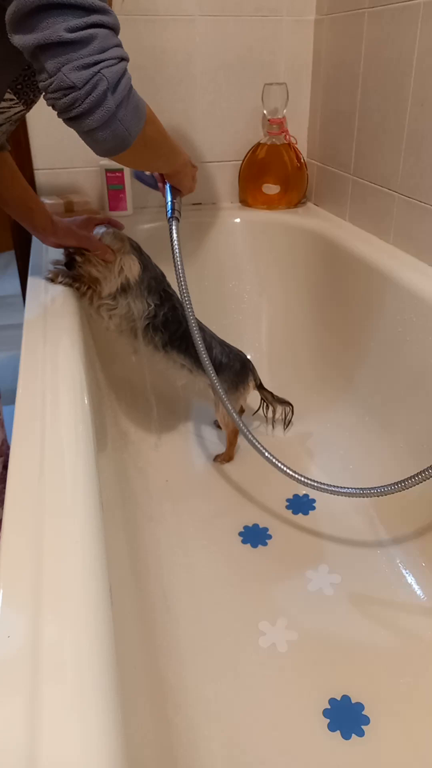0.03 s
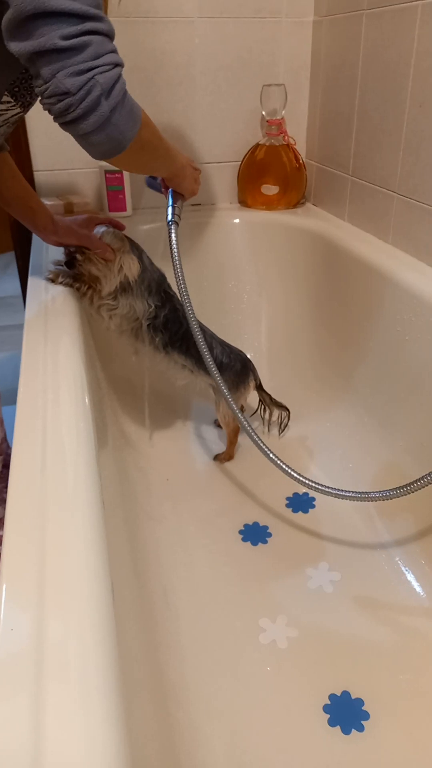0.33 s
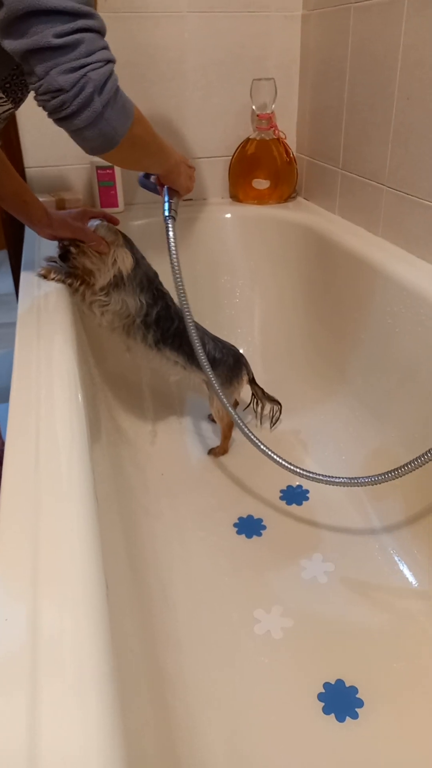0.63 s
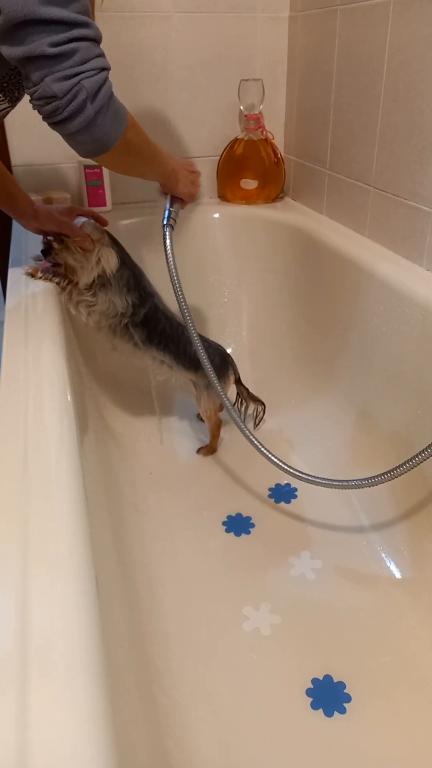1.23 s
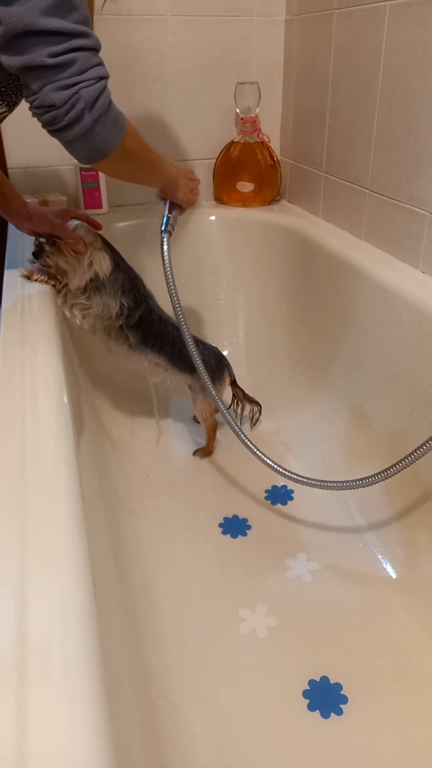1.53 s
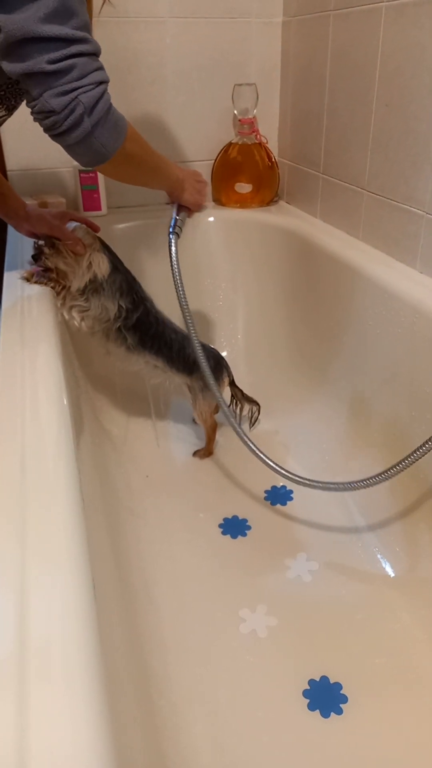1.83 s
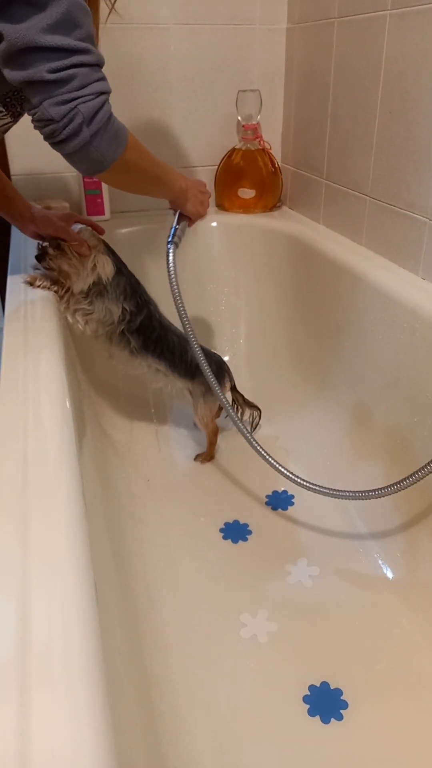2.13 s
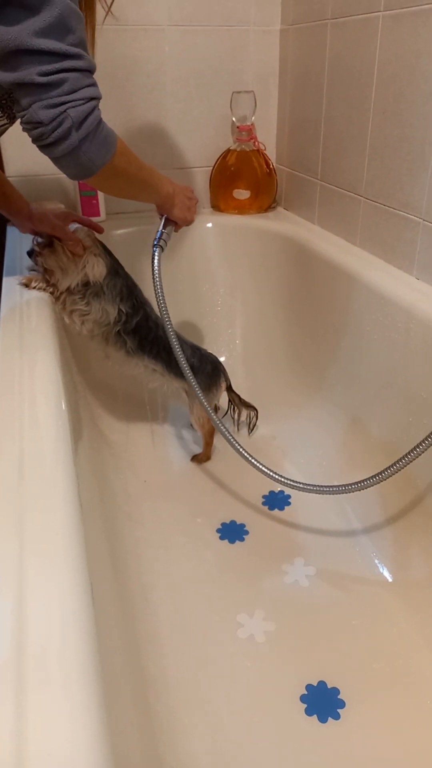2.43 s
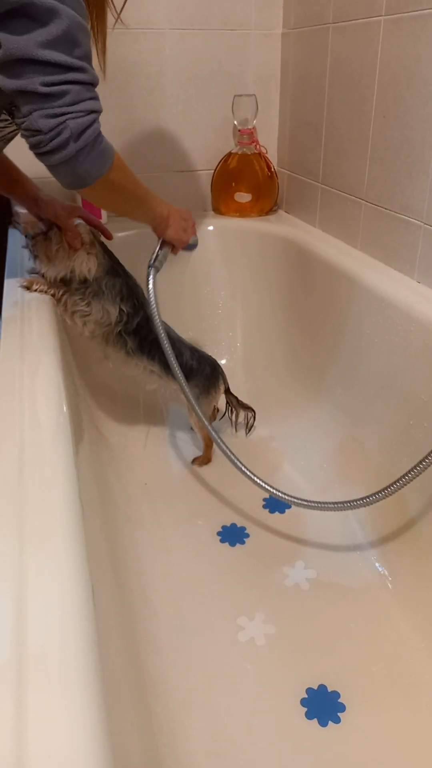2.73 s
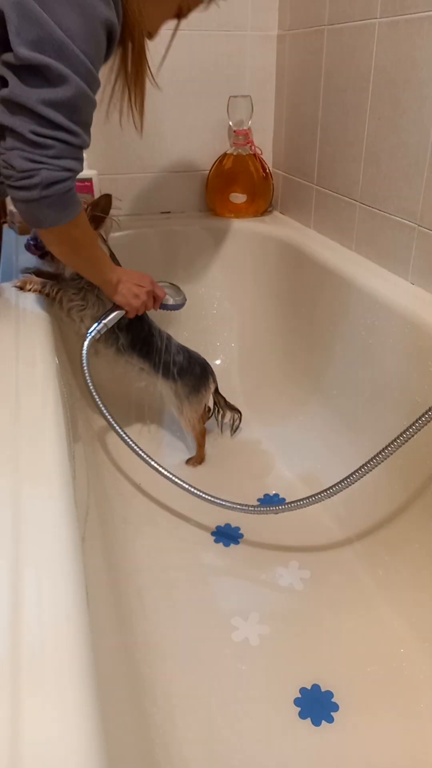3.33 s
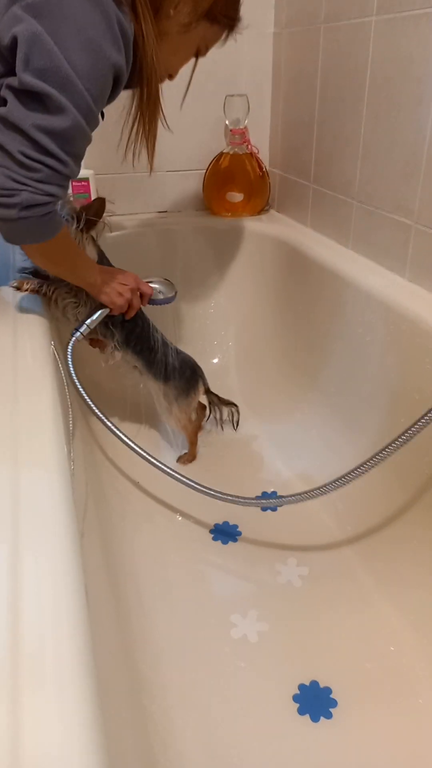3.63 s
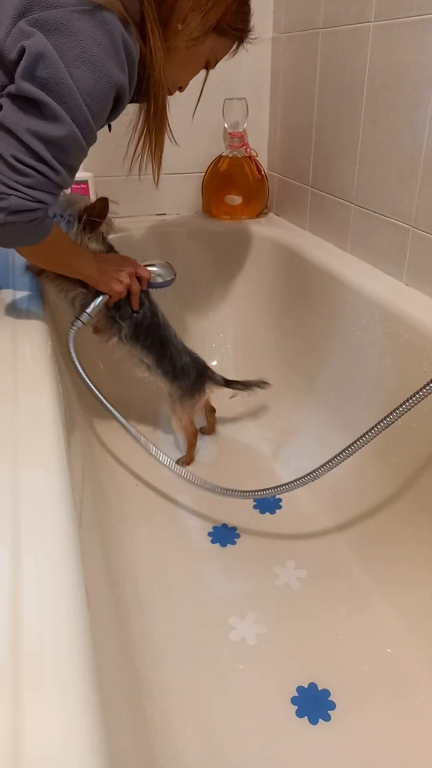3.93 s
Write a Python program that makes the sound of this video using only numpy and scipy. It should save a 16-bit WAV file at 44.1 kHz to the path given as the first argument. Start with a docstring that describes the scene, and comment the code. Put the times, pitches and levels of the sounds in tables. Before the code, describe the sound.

A hand shower sprays over a small dog and a bathtub from the start, a bright, slightly wavering hiss with patter and small bubbly splashes. Occasional fat drops tick, and the jet drums softly and hollowly around 1.5 and 3 seconds. The spray eases a little near 3.7 seconds, and something hard clacks sharply against the tub at about 3.9. A faint hum underlies the tiled bathroom.

```python
"""A hand shower sprays over a small dog in a bathtub in a tiled bathroom.
Fine droplets hiss on tub and coat; heavier drops trap ringing bubbles in the film of water.
At times the jet drums in a hollow, fat drops tick and the tub booms softly.
A faint hum and rumble stand behind. At the end something hard clacks against the tub."""
import sys
import numpy as np
from scipy import signal
from scipy.fft import rfft, irfft, next_fast_len
from scipy.io import wavfile

SR = 44100
rng = np.random.default_rng(int(sys.argv[2]) if len(sys.argv) > 2 else 0)


def log_audio(samples):
    """Write samples as a 16-bit WAV file to the path given in sys.argv[1]."""
    # one column per channel
    frames = np.atleast_2d(samples).T
    # limit to full scale, then quantise
    limited = np.clip(frames, -1, 1)
    pcm = np.round(limited * 32767).astype(np.int16)
    wavfile.write(sys.argv[1], SR, pcm)


N = 176400
TIME = np.arange(N) / SR

# Room rumble spectrum: f/Hz, relative density/dB
RUMBLE_SPECTRUM = [(15, -45), (28, -24), (46, 4), (62, 8.5), (80, -0.5), (125, 1), (170, -7.5), (240, -0.5),
                   (340, -7.5), (500, -6), (900, -28), (3000, -18)]
# Hum partials: f/Hz, level/dB
HUM_PARTIALS = [(100, -83.5), (200, -79.5), (300, -74)]
# Dull bumps in the tub: t/s, length/s, f/Hz, level/dB
TUB_BUMPS = [(.15, 0.5, 63.4, -64.5), (1.11, .08, 250, -66), (2.043, .09, 210, -61.5)]
# Blows of the clack and its rebound: t/s, level/dB
CLACK_BLOWS = [(3.91, -29), (3.9117, -18.5), (3.914, -27), (3.927, -22)]
# Colour of the crack: f/Hz, gain/dB
CRACK_SPECTRUM = [(60, -21), (170, -22), (420, -42), (620, -4), (850, -4), (1100, -8), (1500, 5),
                  (1900, -3), (2600, 3.5), (3300, -1), (4200, 2.5), (5300, -7), (6500, -3), (8600, -1),
                  (10200, -2.5), (11200, 0.5), (13000, -2.5), (15500, 2)]
# Modes rung by the clack: f/Hz, relative level/dB, t60/s
CLACK_MODES = [(94.6, -27.5, .6), (670, -18, .15), (856, -28, 0.18), (1430, -25, 0.09), (1490, -11, .12),
               (2040, -25, .08), (2430, -12, .1), (3160, -14, 0.081), (3720, -17, .06), (4540, -18, .07)]
# Fat drops: t/s, level/dB, centre f/Hz, t60/s
FAT_DROPS = [(0.235, -39, 8000, .015), (0.261, -47, 6450, .15), (0.336, -38, 6500, 0.11),
             (0.669, -36.5, 4670, 0.059), (0.769, -38, 9000, 0.15), (0.814, -42.5, 1190, 0.014),
             (1.124, -29.5, 7500, 0.024), (1.593, -32.5, 6640, 0.027), (3.126, -36, 8200, 0.057),
             (3.305, -44, 13000, .015), (3.595, -34, 13500, .02), (3.622, -28, 13500, 0.013)]
# Jet in a hollow: t/s, length/s, rise/share of length, first f/Hz, last f/Hz, width/Hz, level/dB
HOLLOW_SWELLS = [(.1, 1, 0.49, 707, 708, 7.6, -71), (0.503, 0.66, 0.36, 1996, 2003, 220, -58),
                 (1.454, 0.12, 0.33, 2110, 1644, 320, -52), (1.493, 0.33, 0.22, 1270, 1135, 123, -49.5),
                 (1.777, .08, 0.46, 1900, 2095, 340, -51), (2.621, .56, 0.69, 2307, 2490, 650, -49.5)]
# Splash envelope: t/s, small-bubble level/dB, large-bubble level/dB
SPLASH_LEVELS = [(0.08, -51.5, -65.0), (0.16, -45, -60.5), (0.32, -50, -63.5), (0.38, -43, -58.5),
                 (0.48, -49, -65.5), (0.66, -45, -56.5), (0.88, -52, -62.5), (0.92, -46.5, -61),
                 (1.14, -51.5, -70), (1.18, -43.5, -62), (1.3, -52.5, -69.5), (1.44, -56, -81),
                 (1.48, -44, -67.5), (1.56, -42.5, -63), (1.6, -49, -64), (1.72, -57, -72),
                 (1.82, -44, -57.5), (2.04, -54, -75), (2.12, -46.5, -64), (2.22, -53.5, -74),
                 (2.3, -60, -72), (2.38, -45.5, -62), (2.56, -52.5, -80), (2.6, -45, -67.0),
                 (2.74, -48, -96), (2.8, -53, -90), (3.04, -49.5, -84), (3.36, -49.5, -74),
                 (3.54, -46, -70), (3.88, -55, -76)]
# Bubble strength by pitch: f/Hz, relative level/dB
SMALL_BUBBLES = [(1200, -11.5), (1600, -4.5), (2000, -1), (2500, -8.5), (3200, -9)]
LARGE_BUBBLES = [(600, -4), (750, 2.5), (950, 9.5), (1300, 2), (1700, -8)]
# Spray envelope: t/s, mist level/dB, patter level/dB
SPRAY_LEVELS = [(0.08, -41, -43.5), (0.18, -38.5, -48.0), (0.28, -39, -42.5), (0.36, -35.5, -46.5),
                (0.42, -42, -46), (0.6, -36, -45), (0.64, -41, -48), (0.68, -37, -46.5), (0.72, -40, -44),
                (0.76, -34.5, -45), (0.86, -42, -47.0), (1.04, -35.5, -42.5), (1.1, -39, -45),
                (1.14, -37, -46), (1.18, -39.5, -45), (1.32, -36, -43.5), (1.4, -38.5, -47),
                (1.5, -40.5, -45.5), (1.6, -35, -42.5), (1.72, -40.0, -46), (1.84, -36, -45),
                (1.98, -38.5, -44.5), (2.04, -36.5, -46), (2.12, -41, -46), (2.22, -34, -42.5),
                (2.3, -39, -45.5), (2.36, -42, -43), (2.46, -36, -45.5), (2.6, -40.5, -45),
                (2.66, -34, -41.5), (2.88, -39.0, -43.5), (3.14, -39, -44.0), (3.24, -42.0, -47),
                (3.3, -39.5, -44.5), (3.36, -43.5, -47.5), (3.46, -39, -43.5), (3.64, -35.0, -45),
                (3.7, -45, -49), (3.76, -45.5, -50), (3.88, -44, -51.5)]
# Droplet spectra: f/Hz, relative density/dB
MIST_SPECTRUM = [(5000, -36), (8000, -21), (10500, -1), (12300, 4.5), (14000, 4.5), (15600, 5.5),
                 (17000, 0)]
PATTER_SPECTRUM = [(800, -23.5), (1300, -18), (2200, 1.5), (3000, 0), (4000, 1), (5300, -1), (7000, 0),
                   (9300, 0.5), (12000, -9.5), (16000, -14.5)]
# Stereo balance of the water: f/Hz, left minus right/dB
WATER_BALANCE = [(500, -1), (1200, -0.7), (2200, -0.5), (3300, 2.2), (5500, -3.5), (9000, 4.5),
                 (12500, -0.5), (15000, -5)]

ROOM_T60_S, ROOM_GAP_S, WATER_WET_DB = 0.32, 0.0023, 5.5
DROP_PAN_DB, DROP_LAG_S = 2, .0004


def from_db(db):
    """Decibels to gain."""
    return 10 ** (np.asarray(db) / 20)


def unit_rms(x):
    """Scale to unit power."""
    return x / np.sqrt(np.mean(x ** 2) + 1e-20)


def envelopes(rows):
    """Level columns interpolated to every sample."""
    times_s, *columns = np.transpose(rows)
    return [np.interp(TIME, times_s, column) for column in columns]


def db_at(spectrum, hz):
    """Spectrum level, interpolated over log frequency."""
    points_hz, points_db = np.transpose(spectrum)
    return np.interp(np.log(hz + 1e-9), np.log(points_hz), points_db)


def equalise(x, spectrum, share=1):
    """Filter by a spectrum, its dB scaled by share."""
    size = next_fast_len(N + SR // 10)
    gain = from_db(share * db_at(spectrum, np.fft.rfftfreq(size, 1 / SR)))
    return irfft(rfft(x, size) * gain, size)[..., :N]


def drift(rate_hz):
    """Low-passed noise, unit RMS."""
    hop, settle = 40, 2000
    pole = np.exp(-2 * np.pi * hop * rate_hz / SR)
    noise = rng.standard_normal(N // hop + settle + 2)
    slow = signal.lfilter([1], [1, -2 * pole, pole * pole], noise)[settle:]
    return np.interp(np.arange(N) / hop, np.arange(len(slow)), unit_rms(slow))


def narrow_noise(hz, width_hz):
    """Randomly driven resonance; its centre may glide."""
    phase = 2 * np.pi * np.cumsum(hz * np.ones(N)) / SR
    return drift(width_hz) * np.cos(phase) + drift(width_hz) * np.sin(phase)


def ring(clicks, hz, t60_s):
    """Resonator: a unit click starts a decaying unit sine."""
    radius, angle = 1000 ** (-1 / (t60_s * SR)), 2 * np.pi * hz / SR
    return signal.lfilter([0, np.sin(angle)], [1, -2 * radius * np.cos(angle), radius ** 2], clicks + 1e-18)


def decay(start_s, t60_s):
    """Exponential decay from start_s."""
    return (TIME >= start_s) * 1000 ** (-np.maximum(TIME - start_s, 0) / t60_s)


def bathroom(x, wet_db):
    """Direct sound plus a dense tail from the tiles, different at each ear."""
    tail = (rng.standard_normal((2, N)) * decay(ROOM_GAP_S, ROOM_T60_S))[:, :SR // 2]
    tail /= np.sqrt(np.sum(tail ** 2, axis=1, keepdims=True))
    return x + from_db(wet_db) * signal.fftconvolve(np.atleast_2d(x), tail, axes=1)[:, :N]


def background(rumble_db=-66, side_db=-3):
    """Low room rumble and a faint steady hum."""
    mid, side = unit_rms(equalise(rng.standard_normal((2, N)), RUMBLE_SPECTRUM))
    rumble = from_db(rumble_db) * (mid + from_db(side_db) * side * [[1], [-1]])
    hum = sum(from_db(db) * np.sqrt(2) * np.sin(2 * np.pi * (hz * TIME + rng.random()))
              for hz, db in HUM_PARTIALS)
    return rumble + hum


def tub_bumps():
    """The tub booms softly: swells of low narrow-band noise."""
    out = 0
    for start_s, length_s, hz, db in TUB_BUMPS:
        swell = np.sin(np.pi * np.clip((TIME - start_s) / length_s, 0, 1))
        out += from_db(db) * swell * narrow_noise(hz, width_hz=0.1 * hz)
    return out


def clack(crack_gain_db=1.5, modes_gain_db=-10.5):
    """Hard chattering contact and rebound: a noisy crack plus ringing modes."""
    contact, blows = 0, np.zeros(N)
    for start_s, db in CLACK_BLOWS:
        contact += from_db(db) * decay(start_s, t60_s=0.019)
        blows[int(start_s * SR)] = from_db(db)
    crack = from_db(crack_gain_db) * equalise(contact * rng.standard_normal((2, N)), CRACK_SPECTRUM)
    modes = 0
    for hz, db, t60_s in CLACK_MODES:
        # A mode radiates its velocity: no thud below its pitch.
        velocity = np.diff(ring(blows, hz, t60_s), prepend=0) * SR / (2 * np.pi * hz)
        modes += from_db(modes_gain_db + db) * velocity
    return bathroom(crack, wet_db=0.5) + bathroom(modes, wet_db=5)


def fat_drops():
    """Fat drops smack on the tub, each a noise burst about an octave wide."""
    out = 0
    for start_s, db, hz, t60_s in FAT_DROPS:
        edges_hz = [hz / np.sqrt(2), hz * np.sqrt(2)]
        band = signal.butter(2, edges_hz, "band", fs=SR, output="sos")
        noise = unit_rms(signal.sosfilt(band, rng.standard_normal((2, N))))
        out += from_db(db) * noise * decay(start_s, t60_s)
    return bathroom(out, wet_db=-0.5)


def jet_in_hollow():
    """The jet drums in a hollow: rough resonances swell, glide and fade."""
    out = 0
    for start_s, length_s, rise, first_hz, last_hz, width_hz, db in HOLLOW_SWELLS:
        peak_s, end_s = start_s + rise * length_s, start_s + length_s
        swell = np.interp(TIME, [start_s, peak_s, end_s], [0, 1, 0])
        glide_hz = np.interp(TIME, [start_s, end_s], [first_hz, last_hz])
        out += from_db(db) * swell * narrow_noise(glide_hz, width_hz)
    return bathroom(out, wet_db=2.5)


def impacts(per_s, spread_db, count):
    """Random impacts of uneven size and place, dealt to count stereo click trains."""
    when, size, sign, pan, lag, dealt = rng.random((80000, 6))[:int(per_s * N / SR)].T
    size_db = spread_db * np.minimum(-np.log(1 - size), 5.5)  # capped exponential distribution
    height = np.sign(sign - .5) * from_db(size_db)
    train = (dealt * count).astype(int)
    out = np.zeros((count, 2, N))
    for ear, side in enumerate((1, -1)):
        arrival = (when * N + side * (lag - .5) * DROP_LAG_S * SR).astype(int) % N
        pan_gain = from_db(side * (pan - .5) * DROP_PAN_DB)
        np.add.at(out, (train, ear, arrival), height * pan_gain)
    return out


def bubbles(sizes, per_s, t60_cycles, spread_db):
    """Each drop traps a bubble that rings briefly."""
    trains = impacts(per_s, spread_db, count=24)
    pitches_hz = np.geomspace(sizes[0][0], sizes[-1][0], len(trains))
    rings = sum(from_db(db_at(sizes, hz)) * ring(train, hz, t60_cycles / hz)
                for train, hz in zip(trains, pitches_hz))
    thud_cut = signal.butter(3, pitches_hz[0], "high", fs=SR, output="sos")
    return unit_rms(bathroom(signal.sosfilt(thud_cut, rings), WATER_WET_DB))


def splash(small_gain_db=-1.5, large_gain_db=3):
    """Small and large bubbles in the water on the tub floor."""
    small_db, large_db = envelopes(SPLASH_LEVELS)
    small = bubbles(SMALL_BUBBLES, per_s=1500, t60_cycles=22, spread_db=2.5)
    large = bubbles(LARGE_BUBBLES, per_s=600, t60_cycles=8.1, spread_db=2)
    return from_db(small_gain_db + small_db) * small + from_db(large_gain_db + large_db) * large


def droplets(spectrum, per_s, spread_db):
    """Tiny sharp impacts on several spots, each with its own reflections."""
    hail = sum(bathroom(spot, WATER_WET_DB) for spot in impacts(per_s, spread_db, count=5))
    return unit_rms(equalise(hail, spectrum))


def spray(mist_gain_db=1, patter_gain_db=1.5, flutter_db=0.64):
    """Mist and patter flutter together as the jets wander over tub and coat."""
    mist_db, patter_db = envelopes(SPRAY_LEVELS)
    mist = from_db(mist_gain_db + mist_db) * droplets(MIST_SPECTRUM, per_s=9200, spread_db=4.5)
    patter = from_db(patter_gain_db + patter_db) * droplets(PATTER_SPECTRUM, per_s=3800, spread_db=3.5)
    return (mist + patter) * from_db(flutter_db * drift(rate_hz=28))


def scene():
    """Water, clack, bumps and background in stereo."""
    water = spray() + splash() + jet_in_hollow() + fat_drops()
    water = equalise(water, WATER_BALANCE, share=np.array([[.5], [-.5]]))
    return water + clack() + tub_bumps() + background()


def record(dry):
    """Abrupt start, steep treble cut."""
    start_s, cutoff_hz = .068, 15850
    low_pass = signal.ellip(12, .2, 80, cutoff_hz, fs=SR, output="sos")
    return signal.sosfilt(low_pass, dry * (TIME >= start_s))


dry = scene()
out = record(dry)
log_audio(out)
```